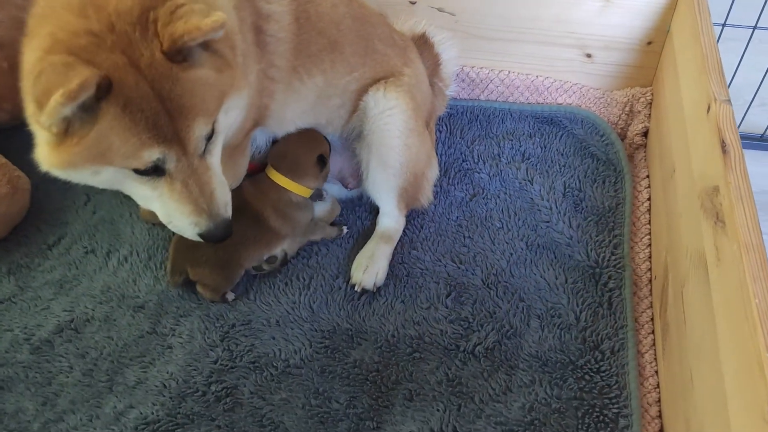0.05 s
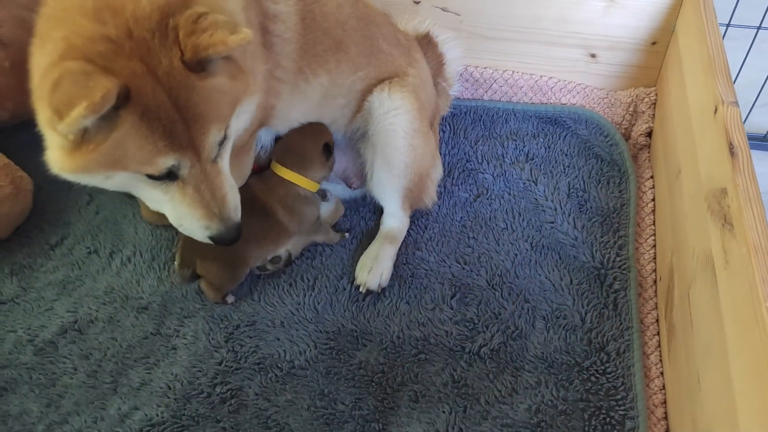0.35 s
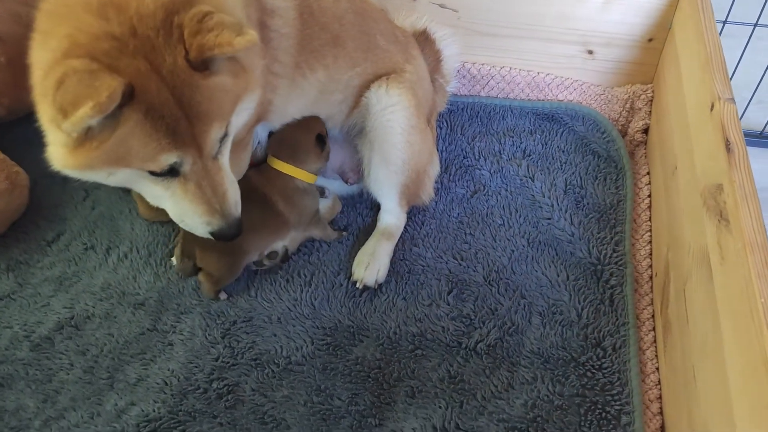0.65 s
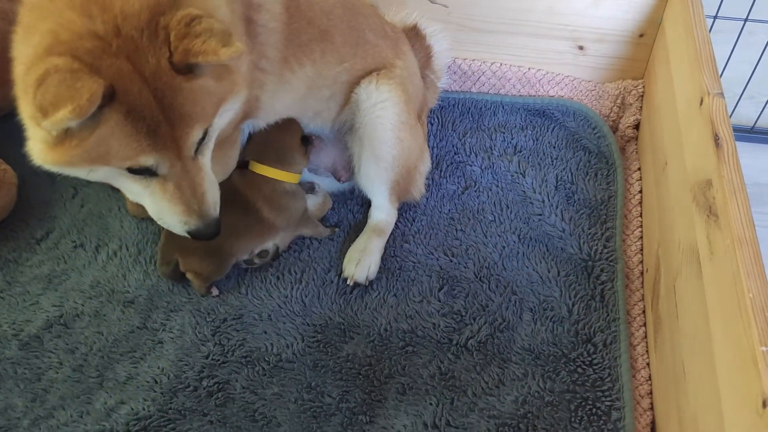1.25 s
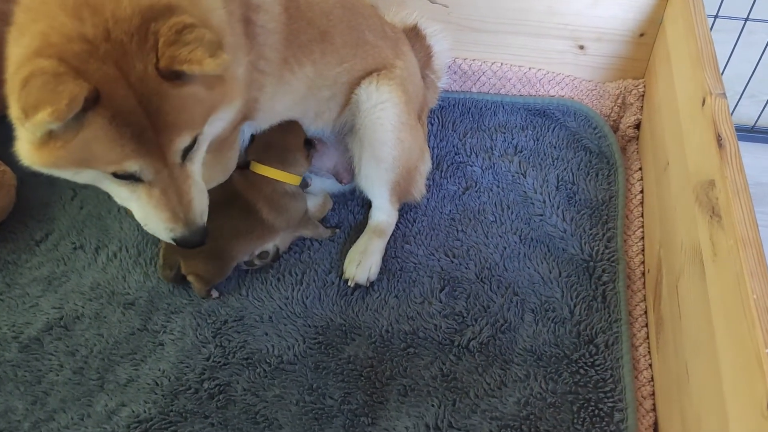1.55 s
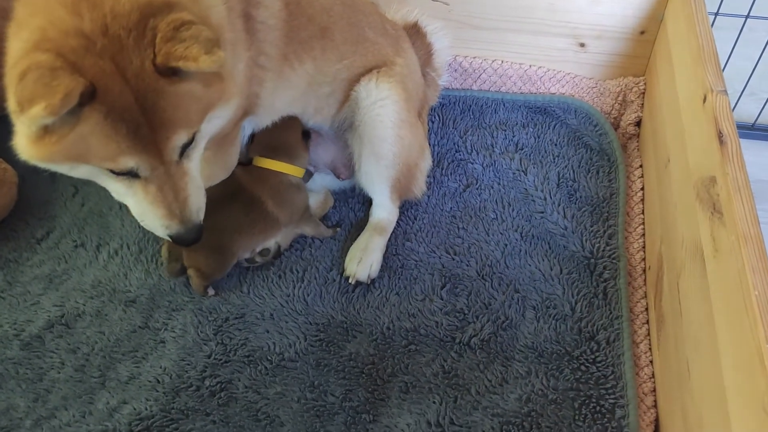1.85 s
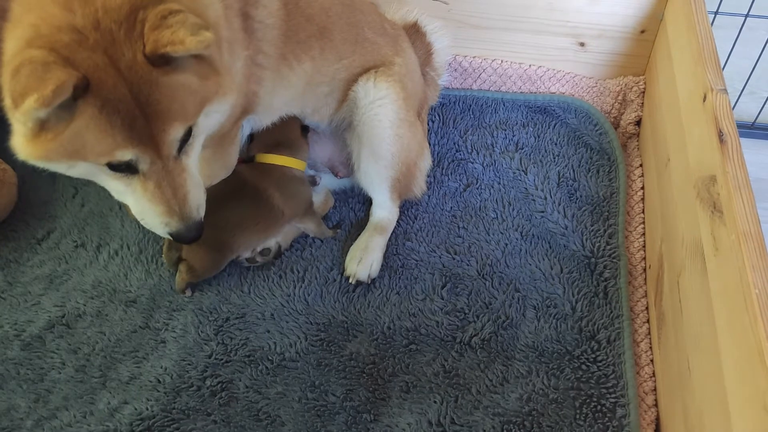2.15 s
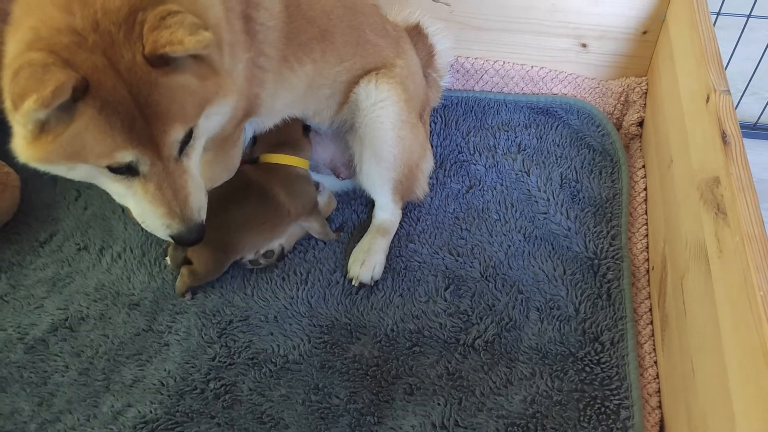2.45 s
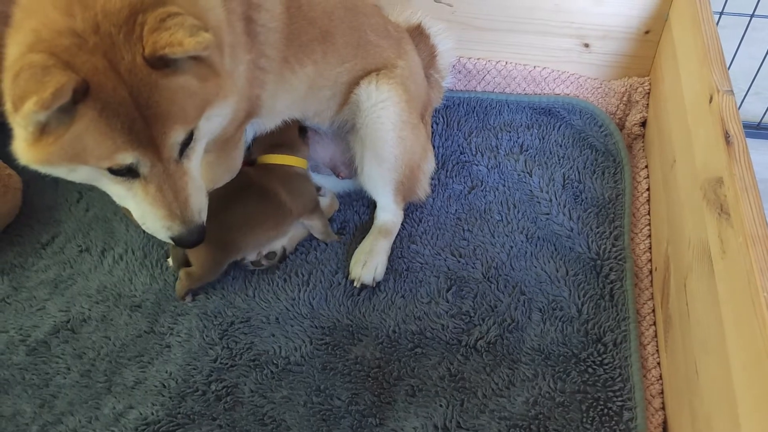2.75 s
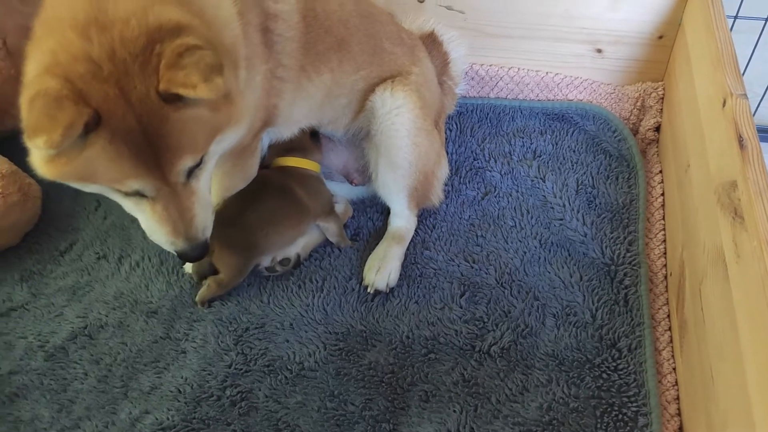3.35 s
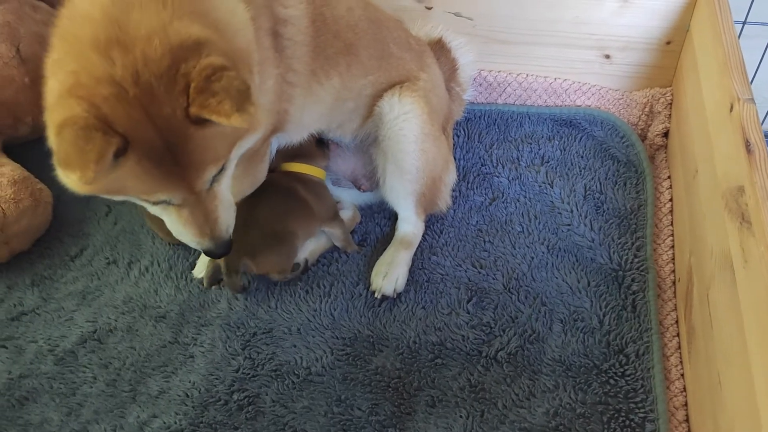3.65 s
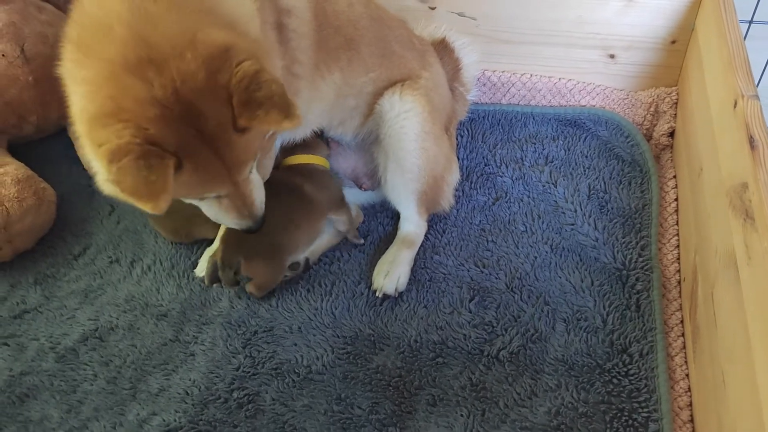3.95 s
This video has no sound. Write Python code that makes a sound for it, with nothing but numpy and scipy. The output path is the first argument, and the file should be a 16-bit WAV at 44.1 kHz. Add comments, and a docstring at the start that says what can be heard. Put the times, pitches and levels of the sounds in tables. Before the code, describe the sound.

Faint sniffing and licking from a dog nosing her puppy, with tiny saliva clicks.

```python
"""In a quiet room, about a metre away and a little to the left, a dog noses and licks her puppy on a mat.
Turbulent air excites her nasal passages as she sniffs in and puffs out. Films of saliva rupture, so
her tongue crackles and her lips click; her muzzle brushes through fur. Something bumps and rumbles
briefly behind the walls, which pass mainly low frequencies. Beneath lie a wavering hum, faint room
air and the microphone's own hiss."""
import sys
import numpy as np
from scipy import signal
from scipy.fft import rfft, irfft
from scipy.io import wavfile
from scipy.ndimage import uniform_filter1d

SR = 44100
rng = np.random.default_rng(int(sys.argv[2]) if len(sys.argv) > 2 else 0)


def output_pcm(signal):
    """Save a mono or channel-first signal as 16-bit PCM at the path in sys.argv[1].

    Samples are clipped to [-1, 1] before scaling.
    """
    pcm = np.clip(np.atleast_2d(signal).T, -1, 1) * 32767
    wavfile.write(sys.argv[1], SR, np.round(pcm).astype(np.int16))


N = 176400
T = np.arange(N) / SR

# breaths in and out (start [s], length [s], level [dB], relative level of nostril hiss or whistle [dB])
SNIFFS_IN = [(.345, 0.084, -68.5, -27), (1.11, 0.095, -69, -4), (1.585, 0.074, -72, -5),
             (1.712, 0.13, -68, -4.5), (2.307, 0.11, -65.5, -8.5), (2.588, .15, -67, -8.5),
             (3.23, .13, -74, -10)]
PUFFS_OUT = [(-.02, 0.068, -65.5, -10), (.695, 0.03, -67.5, -5), (.72, 0.026, -66, 2.5),
             (.759, 0.036, -57.5, -12.5)]
# spectra of the nasal passages and nostrils, for each direction of flow (frequency [Hz], gain [dB])
PASSAGE_IN = [(500, -8.5), (1400, -16.5), (2200, -2), (3100, 1), (4300, -1), (5400, -6), (8000, -16.5),
              (9200, -45), (12500, -10), (16000, -24)]
PASSAGE_OUT = [(500, -22), (1000, -9.5), (1800, -8), (2500, 5), (3400, 2.5), (4200, 1), (5200, -18),
               (7500, -16.5), (9000, -17), (16000, -32)]
NOSTRIL_HISS = [(4500, -27), (5600, -3.5), (6400, -0.5), (7700, -6), (8700, -18), (10500, -15),
                (16000, -20)]
NOSTRIL_WHISTLE = [(8500, -31), (9900, -13), (11300, -6), (12300, -3), (13000, -1), (13800, -7),
                   (16000, -9)]
# wet tongue strokes (start [s], length [s], level [dB], crackle frequency [Hz])
TONGUE_STROKES = [(1.478, 0.048, -74, 6000), (1.807, 0.1, -68.5, 5840), (1.885, 0.056, -71, 5900),
                  (1.955, 0.042, -75, 9500), (3.815, 0.049, -65.5, 6400), (3.896, 0.13, -77, 6170)]
# lip and saliva clicks (time [s], level [dB], frequency [Hz], decay [s])
SALIVA_CLICKS = [(.699, -54, 4840, .0006), (0.7637, -49, 3420, .001), (1.4665, -44.5, 6100, 0.0003),
                 (1.6285, -53, 2600, .0004), (1.7507, -44, 2900, 0.00027), (1.7772, -48, 2330, 0.00021),
                 (2.3302, -48, 2550, 0.00045), (3.6497, -44.5, 4600, 0.00035), (3.6575, -56, 2880, 0.00028),
                 (3.664, -55, 3060, 0.00051), (3.814, -57, 8300, .0008), (3.9417, -54.5, 8800, 0.0003)]
# partings of the lips (time [s], level [dB])
LIP_SMACKS = [(.670, -67), (.679, -63.5)]
# modes of the mouth cavity (frequency [Hz], gain [dB], decay [s])
MOUTH_MODES = [(789, 0, 0.0027), (1290, -1.5, 0.0031), (1580, -4.5, .004), (2230, -5, 0.0035),
               (3140, -3, 0.0033)]
# strokes of the muzzle in fur (start [s], length [s], level [dB])
FUR_RUBS = [(1.205, .5, -76.5), (2.922, 0.2, -84), (3.65, 0.12, -78.5)]
# shape of the dog's left-over-right balance (frequency [Hz], gain [dB])
DOG_LEFT_BIAS = [(800, -7.5), (2200, -1), (3400, 14), (4500, 9), (5900, 10), (7600, 15), (9000, 0.5),
                 (10300, -3), (11800, 2), (13000, 6), (15500, 3)]
# dip in the response of the microphone ports (frequency [Hz], gain [dB])
PORT_RESPONSE = [(7600, 0), (8800, -8), (10000, -1)]
# knocks behind the wall (time [s], level [dB], relative level of the ring [dB])
WALL_BUMPS = [(1.033, -60.5, -14), (1.11, -63.5, -4.5), (1.161, -62.5, -12), (1.224, -67, -2),
              (1.284, -69.5, -4.5), (1.346, -63.5, -15), (1.468, -69, -12), (1.83, -75, -5),
              (1.951, -74, -24)]
# what the wall lets through (frequency [Hz], gain [dB])
WALL_TRANSMISSION = [(90, -43), (160, -1), (240, -2), (340, -3), (400, -15.5), (500, -17), (800, -27),
                     (2000, -63)]
# envelopes of the hum and its overtone, before their trim (time [s], level [dB])
HUM_ENVELOPE = [(0.0, -49.5), (0.38, -61.5), (0.54, -47.5), (0.62, -58.5), (0.99, -49), (1.11, -65),
                (1.3, -45.5), (1.35, -57.5), (1.88, -49), (2.07, -84), (2.13, -56), (2.9, -63.5),
                (3.09, -51.5), (3.21, -69), (3.54, -50), (3.74, -83), (3.98, -51.5), (4.0, -72)]
OVERTONE_ENVELOPE = [(0.0, -61), (0.09, -77.5), (0.61, -66.5), (0.73, -73), (3.19, -80), (3.21, -68),
                     (4.0, -65)]
# the building's rumble (frequency [Hz], gain [dB])
RUMBLE_SPECTRUM = [(5, -7.5), (13, 1.5), (19, -3.5), (30, -9.5), (47, -8.5), (62, -13.5), (75, -21),
                   (105, -20.5), (135, -29), (300, -70.5)]
# noise floor: faint room air below, the microphone's own hiss above (frequency [Hz], gain [dB])
FLOOR_SPECTRUM = [(130, -8.5), (150, -10.5), (180, -9), (250, -9.5), (320, -14.5), (450, -16.5),
                  (730, -20.5), (1100, -24.5), (1650, -25), (2100, -22.5), (2550, -24.5), (3100, -23),
                  (3700, -27.5), (4300, -29.5), (4750, -26), (5250, -31.5), (6200, -32.5), (7500, -39.5),
                  (8800, -51), (10500, -39), (12600, -32.5), (13400, -32), (14200, -33.5), (15500, -32.5)]
# the floor's side over middle, and shape of its left-over-right balance (frequency [Hz], gain [dB])
FLOOR_SIDE = [(130, 0.5), (300, -3), (600, -1), (1500, -.5), (12000, 1)]
FLOOR_LEFT_BIAS = [(300, 1), (1500, 1.4), (3000, 2), (4800, 6), (6500, 3.5), (9000, -0.5), (11000, -4),
                   (13300, 5), (15500, -8.5)]


def undb(db):
    """Decibels to amplitude ratio."""
    return 10 ** (np.asarray(db) / 20)


def unit(x):
    """Normalisation to rms 1."""
    return x / np.sqrt(np.mean(x ** 2) + 1e-30)


def noise():
    """White Gaussian noise."""
    return rng.standard_normal(N)


def colour(x, points, power=1):
    """Zero-phase filtering by a (frequency [Hz], gain [dB]) curve, its decibels scaled by power."""
    hz, db = np.array(points, float).T
    bins_hz = np.maximum(np.arange(N // 2 + 1) * SR / N, 1)
    gain_db = power * np.interp(np.log(bins_hz), np.log(hz), db)
    return irfft(rfft(x) * undb(gain_db), N)


def resonate(x, hz, q):
    """Two like resonators in cascade give steep skirts."""
    section = np.concatenate(signal.iirpeak(hz, q, SR))
    return signal.sosfilt(np.tile(section, (2, 1)), x)


def wander(rate_hz):
    """Smooth random fluctuation of rms 1."""
    hold = int(SR / rate_hz)
    steps = np.repeat(rng.standard_normal(N // hold + 1), hold)
    return unit(uniform_filter1d(uniform_filter1d(steps, hold), hold)[:N])


def swell(start, length, attack_s, release_s):
    """Linear attack and release, both within the length."""
    return np.clip((T - start) / attack_s, 0, 1) * np.clip((start + length - T) / release_s, 0, 1)


def strike(start, rise_s, decay_s):
    """Linear rise, then exponential decay."""
    age = np.maximum(T - start, 0)
    return np.minimum(age / rise_s, 1) * np.exp(-np.maximum(age - rise_s, 0) / decay_s)


def mode(start, hz, rise_s, decay_s):
    """Free vibration of a damped oscillator."""
    return strike(start, rise_s, decay_s) * np.sin(2 * np.pi * hz * (T - start))


def stereo_noise(width=1):
    """Middle plus and minus side: the channels are uncorrelated at width 1."""
    mid, side = noise(), width * noise()
    return np.array([mid + side, mid - side])


def nose(breaths, passage, nostril, attack_s, release_s):
    """Turbulence: fluttering bursts of air excite the nasal passages and hiss at the nostrils."""
    body = unit(colour(stereo_noise(), passage))
    hiss = unit(colour(stereo_noise(), nostril))
    flow = sum(swell(t, length, attack_s, release_s) * undb(db) * (body + undb(hiss_db) * hiss)
               for t, length, db, hiss_db in breaths)
    return flow * undb(wander(rate_hz=150))  # flutter of 1 dB rms


def licks(pops_per_s=2900, scatter_db=0.5):
    """Shot noise: tiny films burst in a dense crackle as the tongue peels off wet fur."""
    out = 0
    for t, length, db, hz in TONGUE_STROKES:
        ruptures = rng.random(N) < pops_per_s / SR
        pops = ruptures * undb(scatter_db * noise()) * stereo_noise()
        crackle = unit(resonate(pops, hz, q=2.6))
        out += undb(db) * swell(t, length, attack_s=0.011, release_s=0.054) * crackle
    return out


def clicks():
    """Impulse response: a film of saliva snaps and rings a small air pocket for a few cycles."""
    return sum(undb(db) * mode(t, hz, rise_s=0.0001, decay_s=decay) for t, db, hz, decay in SALIVA_CLICKS)


def smacks():
    """Cavity resonance: the lips part softly and the modes of the mouth ring."""
    return sum(undb(db + mode_db) * mode(t, hz, rise_s=0.0028, decay_s=decay)
               for t, db in LIP_SMACKS for hz, mode_db, decay in MOUTH_MODES)


def fur(hairs_per_s=900, unevenness_db=2):
    """Friction: the muzzle brushes through fur with faint, uneven ticks of hair."""
    hairs = (rng.random(N) < hairs_per_s / SR) * stereo_noise()
    ticks = unit(resonate(hairs, hz=3180, q=1.6))
    brush = sum(undb(db) * swell(t, length, attack_s=0.067, release_s=0.06) for t, length, db in FUR_RUBS)
    return brush * undb(unevenness_db * wander(rate_hz=39.9)) * ticks


def dog(reflection_db=-4):
    """Early reflections from the wooden pen join the muzzle sounds; channel balance sets them left."""
    sniffs = nose(SNIFFS_IN, PASSAGE_IN, NOSTRIL_HISS, attack_s=0.021, release_s=0.032)
    puffs = nose(PUFFS_OUT, PASSAGE_OUT, NOSTRIL_WHISTLE, attack_s=0.0049, release_s=0.011)
    direct = sniffs + puffs + licks() + clicks() + smacks() + fur()
    pen_response = unit(stereo_noise() * strike(0.0022, rise_s=0.00067, decay_s=0.032)) / np.sqrt(N)
    reflections = undb(reflection_db) * signal.fftconvolve(direct, pen_response, axes=1)[:, :N]
    left, right = colour(direct + reflections, PORT_RESPONSE)
    return np.array([left, colour(right, DOG_LEFT_BIAS, power=-0.91)])


def bumps(rise_s=0.0073):
    """Transmission loss: the wall dulls each knock to a short thud and a rumble with a low ring."""
    out = 0
    for t, db, ring_db in WALL_BUMPS:
        blow = stereo_noise(width=0.22)
        rumble = unit(colour(blow, WALL_TRANSMISSION))
        ring = undb(ring_db) * unit(resonate(blow, hz=366, q=5.7))
        thud = undb(3) * mode(t, hz=287, rise_s=rise_s, decay_s=0.0041)
        out += undb(db) * (strike(t, rise_s, decay_s=0.085) * (rumble + ring) + thud)
    return out


def hum(trim_db=-1):
    """Amplitude and frequency modulation: a low tone and its weak overtone waver."""
    out = 0
    for envelope, hz, drift in ((HUM_ENVELOPE, 57.66, 0.02885), (OVERTONE_ENVELOPE, 117.54, 0.02)):
        level_db = np.interp(T, *np.array(envelope).T) + trim_db
        pitch_hz = hz * (1 + drift * wander(rate_hz=12))
        phase = 2 * np.pi * np.cumsum(pitch_hz) / SR
        out += undb(level_db) * np.sqrt(2) * np.sin(phase)
    return out


def noise_floor(rumble_db=-51.5, floor_db=-70):
    """Coherence: building rumble is alike in both channels; room air and microphone hiss are wide."""
    rumble = undb(rumble_db) * unit(colour(stereo_noise(width=0.22), RUMBLE_SPECTRUM))
    low_cut = signal.butter(4, 130, "high", fs=SR, output="sos")
    mid, side = (unit(signal.sosfilt(low_cut, colour(noise(), FLOOR_SPECTRUM))) for _ in range(2))
    side = colour(side, FLOOR_SIDE)
    left = colour(mid + side, FLOOR_LEFT_BIAS, power=0.4)
    right = colour(mid - side, FLOOR_LEFT_BIAS, power=-0.54)
    return rumble + undb(floor_db) * np.array([left, right])


def scene():
    """Superposition: the dog and the background add."""
    return dog() + bumps() + hum() + noise_floor()


def record(dry):
    """Band limiting: the recorder's steep low-pass filter cuts the highest treble."""
    cutoff_hz = 15750
    return signal.sosfilt(signal.ellip(10, 0.1, 70, cutoff_hz, fs=SR, output="sos"), dry)


dry = scene()
out = record(dry)
output_pcm(out)
```